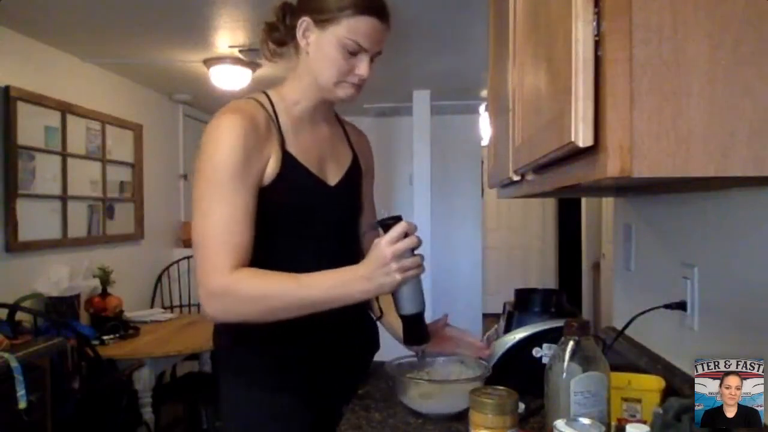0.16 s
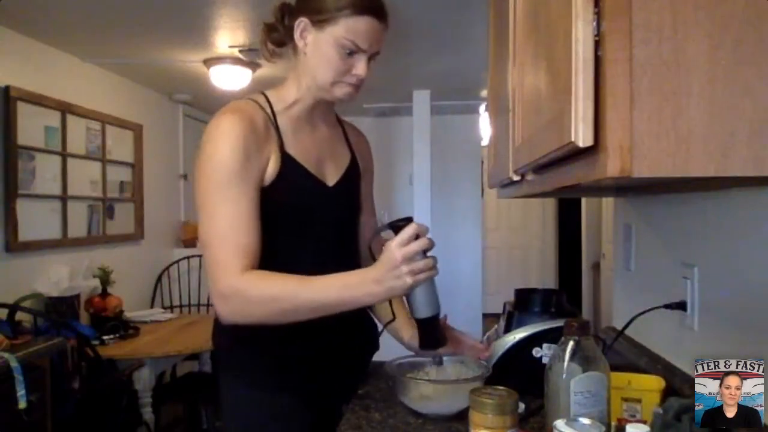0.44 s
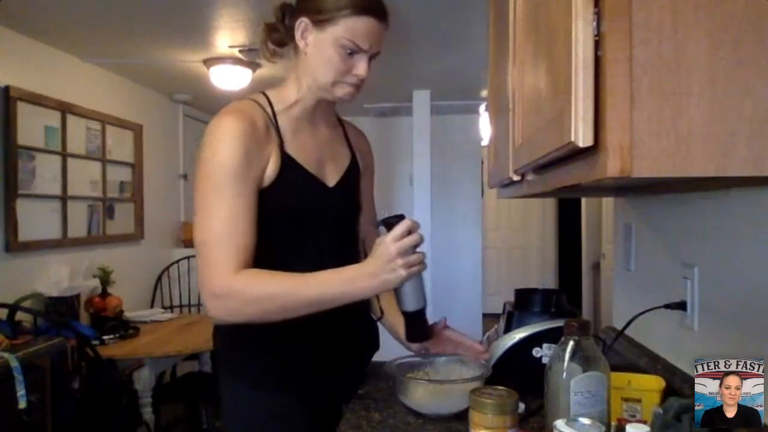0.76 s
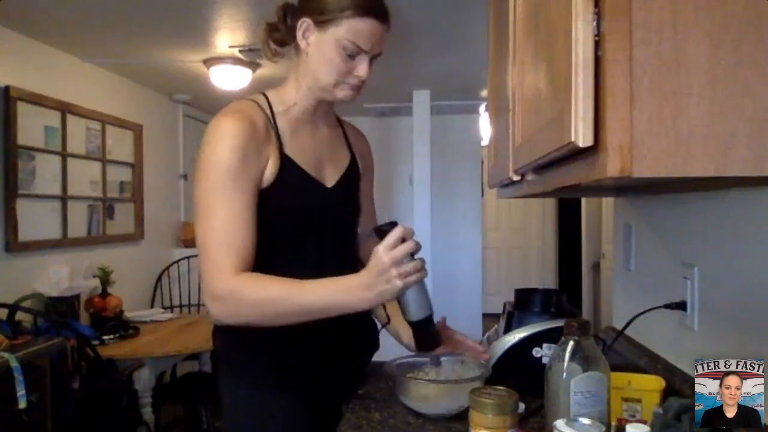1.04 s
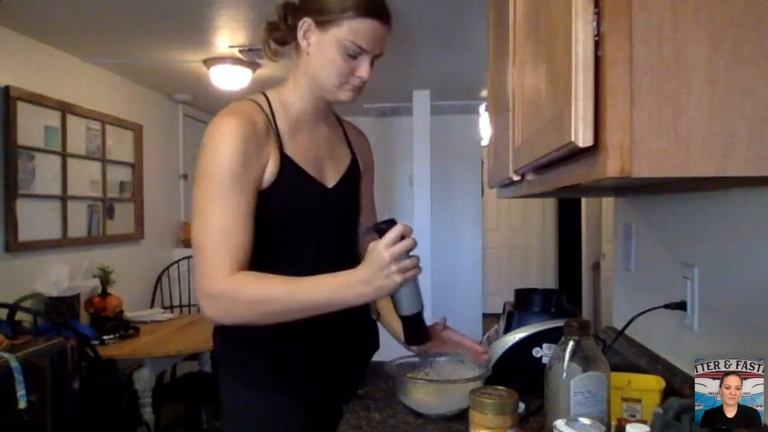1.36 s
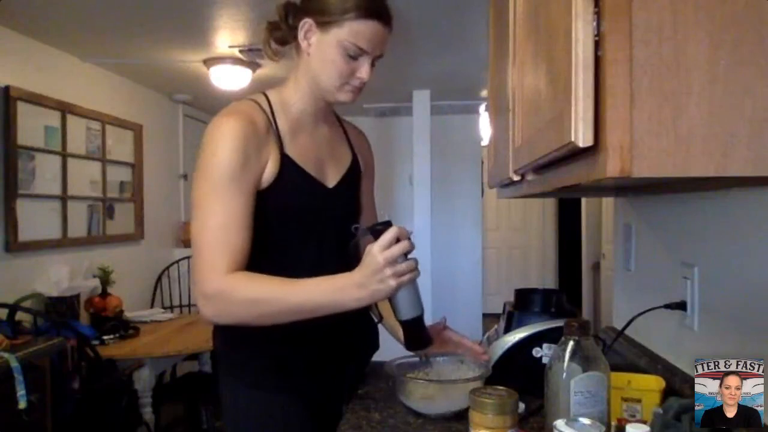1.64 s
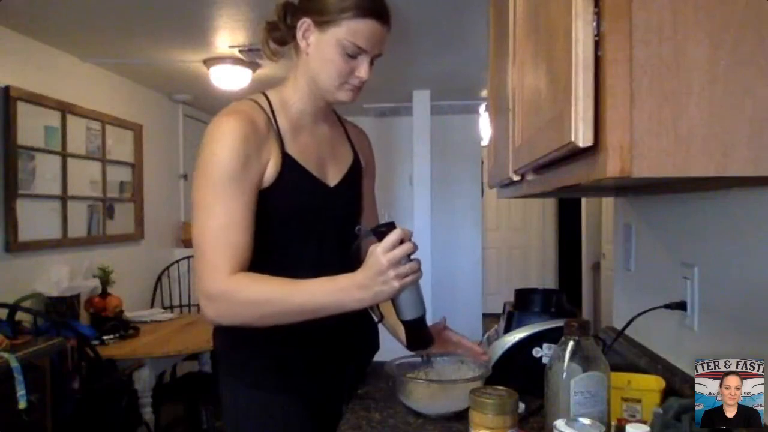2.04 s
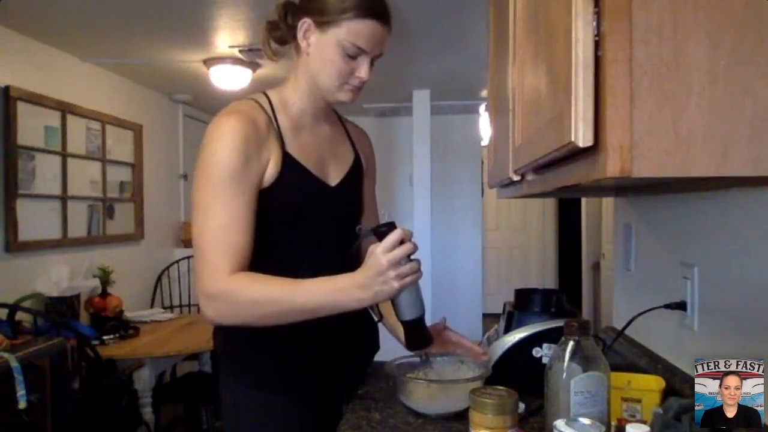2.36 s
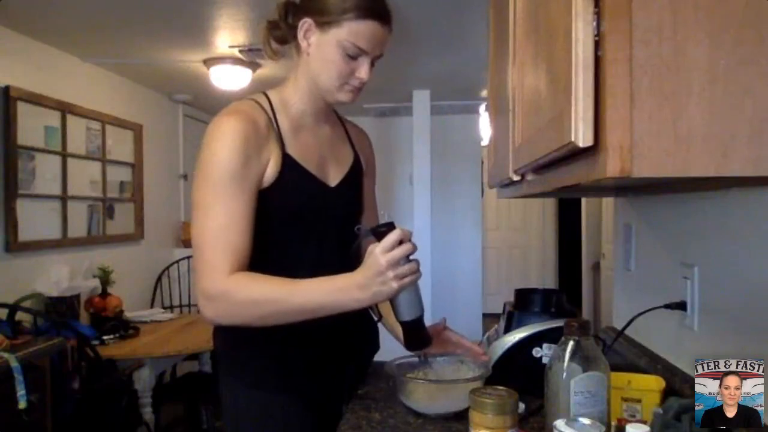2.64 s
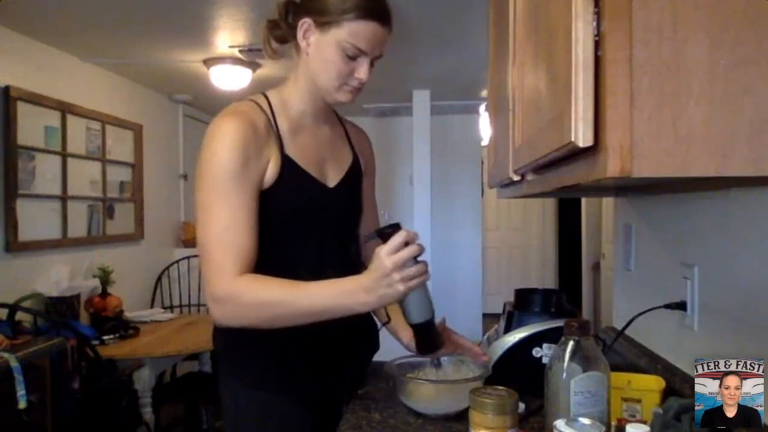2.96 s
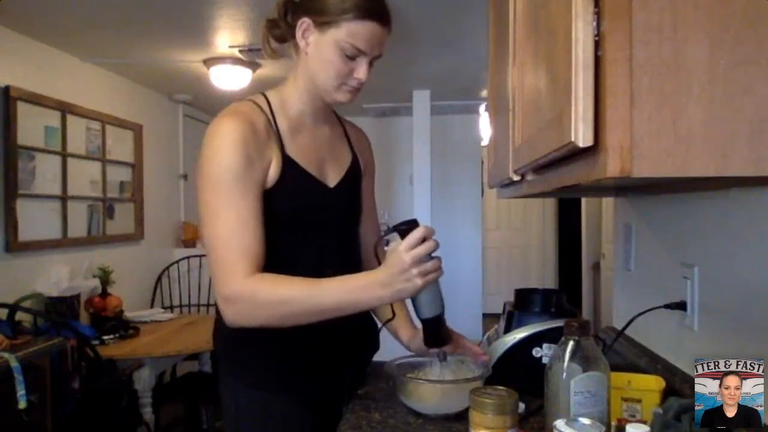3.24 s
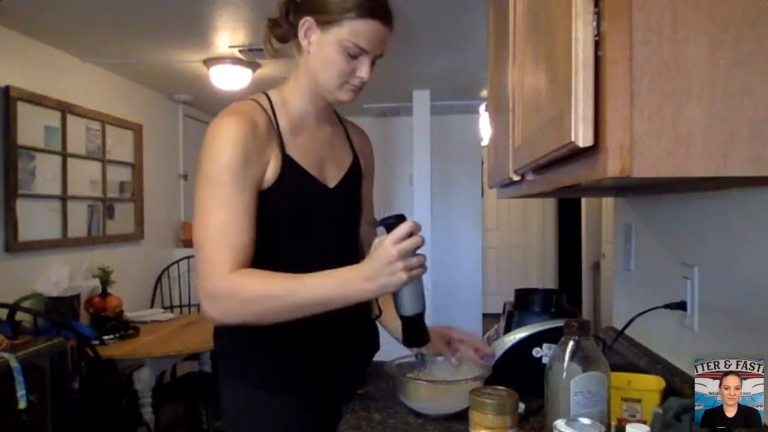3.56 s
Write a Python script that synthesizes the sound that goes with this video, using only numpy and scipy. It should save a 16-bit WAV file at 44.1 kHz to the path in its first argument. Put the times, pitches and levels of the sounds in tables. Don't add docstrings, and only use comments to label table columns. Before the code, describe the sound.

A hand blender whisks a thick mix, bursting out loud before dropping to a patchy, quieter whir.

```python
import sys
import numpy as np
from scipy import signal
from scipy.fft import rfft, irfft
from scipy.io import wavfile
from scipy.ndimage import uniform_filter1d, map_coordinates

SR = 44100
rng = np.random.default_rng(int(sys.argv[2]) if len(sys.argv) > 2 else 0)


def dump_mix(stems):
    frames = np.atleast_2d(stems).T
    limited = np.clip(frames, -1, 1)
    pcm = np.round(limited * 32767).astype(np.int16)
    wavfile.write(sys.argv[1], SR, pcm)


def decibels_to_gain(level_db):
    exponent = np.asarray(level_db, float) / 20
    return 10 ** exponent


N = 163170
T = np.arange(N) / SR


def noise():
    return rng.standard_normal(N)


def in_time(rows):
    s, *cols = np.transpose(rows)
    return [np.interp(T, s, c) for c in cols]


def rms_one(x):
    return x / np.sqrt(np.mean(x ** 2) + 1e-20)


def drift(rate_hz):
    r = np.exp(-80 * np.pi * rate_hz / SR)
    slow = signal.lfilter([1], [1, -2 * r, r * r], rng.standard_normal(N // 40 + 2002))[2000:]
    return np.interp(np.arange(N) / 40, np.arange(len(slow)), rms_one(slow))


def coloured(x, points):
    hz, db = np.transpose(points)
    f = np.arange(1, N // 2 + 2) * SR / N
    gain = decibels_to_gain(np.interp(np.log(f), np.log(hz), db))
    return rms_one(irfft(rfft(x) * gain, N))


def resonance(x, hz, width_hz):
    r = np.exp(-np.pi * width_hz / SR)
    ring = [1, -2 * r * np.cos(2 * np.pi * hz / SR), r * r]
    return rms_one(signal.lfilter([1, 0, -1], ring, x))


def band(x, low_hz, high_hz):
    return signal.sosfilt(signal.butter(6, [low_hz, high_hz], "band", fs=SR, output="sos"), x)


# time in seconds, level in dB.
LOAD_LEVEL = [(0, -18), (.3, -18.5), (.62, -18), (.684, -21.5), (.705, -32), (.75, -29.5), (.775, -34),
              (.8, -30), (1.3, -30.5), (1.9, -30), (2.5, -30), (2.9, -29.5), (3.2, -30.5), (3.5, -31),
              (3.7, -30)]


def whisking_level():
    return in_time(LOAD_LEVEL)[0]


def turning():
    turns_hz, depth, jitter = 18.3, 0.2, 0.022
    phase = 2 * np.pi * np.cumsum(turns_hz * (1 + jitter * drift(2.45))) / SR
    return 1 + depth * np.sin(phase)


# time in seconds, pitch in Hz, level against the churn in dB.
GEAR_PITCH = [(0, 2564, -10), (.35, 2658, -5), (.6, 2656, -9.5), (1, 2650, -9.5), (1.6, 2726, -7.5),
              (2.3, 2660, -8.5), (2.9, 2680, -8), (3.7, 2613, -8)]
# multiple of the pitch, level in dB, blur in Hz.
GEAR_OVERTONES = [(1, -3.3, 46), (2, -6, 37), (3, -8.5, 57)]


def gears(throb):
    hz, db = in_time(GEAR_PITCH)
    phase = 2 * np.pi * np.cumsum(hz) / SR
    whine = np.zeros(N)
    for multiple, level_db, width_hz in GEAR_OVERTONES:
        angle = round(multiple) * phase
        rough_tone = drift(width_hz) * np.cos(angle) + drift(width_hz) * np.sin(angle)
        whine += decibels_to_gain(level_db) * rough_tone
    return decibels_to_gain(db) * throb * whine


def wire_ticks():
    ticks_per_s, spread_db = 2500, 3
    sizes = decibels_to_gain(spread_db * np.minimum(rng.exponential(1, N), 4)) * rng.choice([-1, 1], N)
    return rms_one(sizes * (rng.random(N) < ticks_per_s / SR))


# pitch in Hz, width in Hz, level in dB.
BOWL_AND_HOUSING = [(690, 41, -25), (1624, 210, -19), (2000, 100, -36), (3083, 31, -15.5), (2953, 48, -20),
                    (2810, 1020, -11.5), (5494, 310, -11.5), (6180, 260, -13), (7780, 380, -17),
                    (9570, 100, -28.5), (10150, 170, -26), (11800, 250, -52)]
# pitch in Hz, level in dB per Hz.
CHURN_COLOUR = [(560, -34), (680, -6.5), (1300, -0.5), (3300, -1), (4000, -10), (5300, -3), (8300, -2),
                (11300, -21.5)]


def wires(throb):
    churn_db, patch_db = -6.5, -2
    ticks = 0.52 * wire_ticks()
    out = decibels_to_gain(churn_db + patch_db * drift(30)) * coloured(ticks + noise(), CHURN_COLOUR)
    for hz, width_hz, db in BOWL_AND_HOUSING:
        out += decibels_to_gain(db + 1.14 * drift(6.5)) * resonance(ticks + noise(), hz, width_hz)
    return out * throb ** 0.054


# time in seconds, drone level in dB.
BOWL_PRESS = [(0, -50), (.15, -42), (.5, -46.5), (.57, -50), (.7, -48), (.76, -51), (.84, -44.5),
              (1.14, -45.5), (1.22, -52), (1.4, -47.5), (1.8, -43.5), (2.2, -45.5), (2.6, -47),
              (2.72, -46.5), (2.9, -45), (3.17, -46.5), (3.4, -48), (3.7, -47.5)]


def worktop_drone():
    drone_hz, width_hz, patch_db = 153, 40, 0.7
    drone = resonance(resonance(noise(), drone_hz, width_hz), drone_hz, 88)
    drone /= np.sqrt(uniform_filter1d(drone ** 2, size=2500))
    return decibels_to_gain(in_time(BOWL_PRESS)[0] + patch_db * drift(24)) * drone


# pitch in Hz, level in dB per Hz.
ROOM_COLOUR = [(25, -7), (97, -9), (151, -9), (237, -4), (485, 4.1), (640, 3.5), (900, -7), (1500, -10)]


def room_floor(load_db):
    floor_db, follows = -43.5, 0.05
    return decibels_to_gain(floor_db + follows * (load_db - load_db.min())) * coloured(noise(), ROOM_COLOUR)


# pitch in Hz, level in dB.
HUM_TONES = [(298, -61.5), (356, -57.5)]


def appliance_hum():
    return sum(decibels_to_gain(db + 1.6 * drift(12)) * np.sin(2 * np.pi * hz * T) for hz, db in HUM_TONES)


# start in seconds, peak in dB, pitch in Hz, time to fall 60 dB in seconds.
WORKTOP_KNOCKS = [
    (0.276, -26, 160, 0.22),
    (0.447, -24.5, 153, 0.11),
    (0.593, -20.5, 150.4, 0.23),
    (0.651, -28, 139.5, 0.2),
    (1.937, -18.5, 160, 0.055),
    (3.645, -41, 143, 0.27),
    (3.684, -20.5, 257, 0.096),
    (3.687, -32, 405, 0.062),
    (3.688, -24, 526, 0.051),
    (3.683, -26, 170, .1),
]


def knocks():
    out = np.zeros(N)
    for s, db, hz, t60 in WORKTOP_KNOCKS:
        u = np.clip(T - s, 0, None)
        shape = (1 - np.exp(-u / 0.006)) * decibels_to_gain(db - 60 * u / t60)
        low_note = 0.23 * np.sin(1.25 * np.pi * hz * u) * np.exp(-u / 0.05)
        out += shape * (np.sin(2 * np.pi * hz * u) + low_note)
    return out


# start in seconds, length in seconds, pitch in Hz, level in dB.
WIRE_SQUEALS = [
    (.672, .088, 3110, -28.5),
    (.672, .07, 2860, -32),
    (.675, .047, 7950, -28),
    (.672, .04, 5310, -33),
    (.44, .18, 3055, -30),
]


def squeals():
    out = np.zeros(N)
    for s, length, hz, db in WIRE_SQUEALS:
        shape = np.clip(np.minimum(T - s, s + length - T) / 0.0083, 0, 1)
        tone = resonance(resonance(noise(), hz, 63), hz, 110)
        steady = tone / np.sqrt(uniform_filter1d(tone ** 2, size=700))
        out += decibels_to_gain(db) * shape * steady
    return out


def scene():
    load_db = whisking_level()
    throb = turning()
    blender = decibels_to_gain(load_db) * (wires(throb) + gears(throb)) + squeals()
    kitchen = worktop_drone() + room_floor(load_db) + appliance_hum() + knocks()
    mono = blender + kitchen
    return np.array([mono, mono])


# pitch in Hz, width in Hz, change in dB.
DARK_DIPS = [(11370, 360, -6), (4006, 160, -1), (6700, 130, -0.5)]


def flickering_bands(x):
    grain_db, grain_bins, hole_share, hole_db = 3.0, 1.6, 0.11, -12
    hz, _, z = signal.stft(x, SR, nperseg=1024)
    dips_db = sum(db * np.exp(-((hz - at_hz) / width_hz) ** 2) for at_hz, width_hz, db in DARK_DIPS)
    above = (hz > 400)[:, None]
    at = np.meshgrid(np.arange(z.shape[0]) / grain_bins, np.arange(z.shape[1]) / 2, indexing="ij")
    flicker = map_coordinates(rng.standard_normal(z.shape), at, order=1)
    z = z * decibels_to_gain(dips_db[:, None] + above * grain_db * flicker)
    power = uniform_filter1d(uniform_filter1d(abs(z) ** 2, size=2, axis=0), size=3, axis=1)
    weak = above & (power < hole_share * uniform_filter1d(power, size=26, axis=0))
    return signal.istft(z * np.where(weak, decibels_to_gain(hole_db), 1), nperseg=1024)[1][:N]


# start in seconds, end in seconds, level of the filling hiss in dB.
STREAM_GAPS = [(0.644, 0.65, -5), (1.18, 1.19, -5.5), (1.606, 1.611, -5), (2.219, 2.237, -7),
               (2.788, 2.789, -6.5), (2.92, 2.979, -5), (3.011, 3.101, -2.5), (3.251, 3.325, -9),
               (3.351, 3.38, -4), (3.533, 3.542, -7), (3.588, 3.602, -5.5)]
# pitch in Hz, level in dB per Hz.
HISS_COLOUR = [(100, -11), (400, -9.5), (1500, -9.3), (3500, -7.5), (6000, -9.5), (9000, -11.5),
               (11500, -30)]


def dropouts(x):
    cut_s, return_s, fade_db_per_s = 0.014, 0.018, 354
    keep, fill = np.ones(N), np.zeros(N)
    for s, end, db in STREAM_GAPS:
        gone = np.clip(np.minimum((T - s) / cut_s, 1 - (T - end) / return_s + 0.5), 0, 1)
        gone = np.sin(np.pi / 2 * gone) ** 2
        keep *= 1 - gone
        fill += np.sqrt(gone) * decibels_to_gain(db - fade_db_per_s * np.clip(T - s, 0, 1))
    hiss = decibels_to_gain(whisking_level()) * coloured(noise(), HISS_COLOUR)
    return keep * x + fill * hiss


def patchy_air(x):
    level = np.sqrt(uniform_filter1d(x ** 2, size=6000) + 1e-12)
    level = level * (T < 3.08) * (drift(16) < 1.1)
    air = sum(band(noise(), hz, hz + 500) * decibels_to_gain(3.5 * drift(10)) for hz in range(12400, 15600, 550))
    return decibels_to_gain(-38) * uniform_filter1d(level, size=300) * air


# start and end in seconds, low and high edge in Hz, level in dB.
WIDE_MOMENTS = [
    (.02, 0.074, 9400, 11800, -7),
    (.18, 0.248, 9700, 11800, -9),
    (.96, 1.001, 9700, 11800, -8),
    (1.46, 1.498, 9000, 10400, -7),
    (3.11, 3.7, 9000, 11800, -4.5),
    (3.107, 3.162, 4220, 8530, 0),
    (3.168, 3.699, 4240, 4700, -9),
    (3.58, 3.64, 4700, 8800, -23),
]


def treble_width(x):
    side = np.zeros(N)
    for s, end, low_hz, high_hz, db in WIDE_MOMENTS:
        on = uniform_filter1d(1.0 * (T > s) * (T < end), size=400)
        side += decibels_to_gain(db) * on * band(np.roll(x, 997), low_hz, high_hz)
    return side


def top_cut(x):
    return signal.sosfilt(signal.butter(12, 15720, fs=SR, output="sos"), x)


def record(dry):
    x = dropouts(flickering_bands(dry[0]))
    low = signal.sosfilt(signal.ellip(10, 0.5, 70, 12050, fs=SR, output="sos"), x)
    middle = low + patchy_air(x)
    side = treble_width(low)
    return top_cut(np.array([middle + side, middle - side]))


dry = scene()
out = record(dry)
dump_mix(out)
```